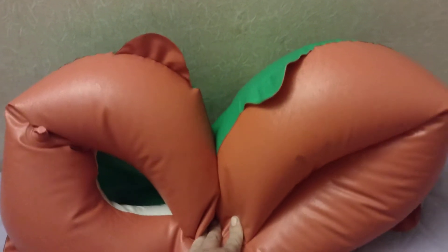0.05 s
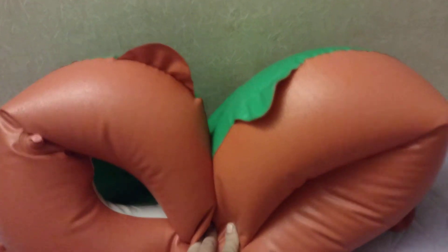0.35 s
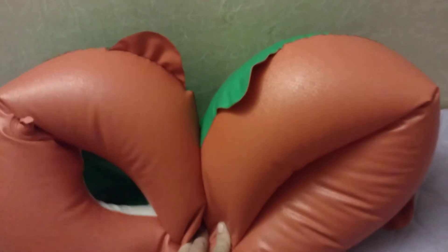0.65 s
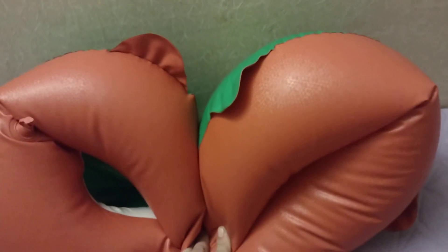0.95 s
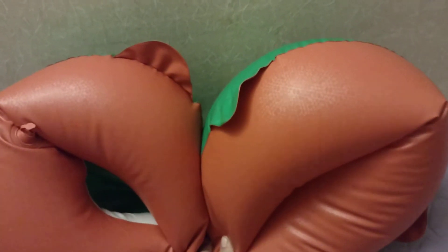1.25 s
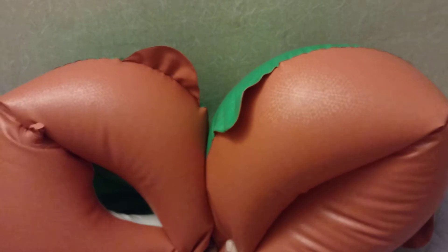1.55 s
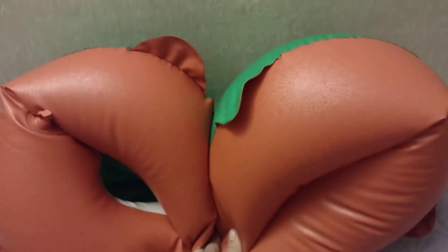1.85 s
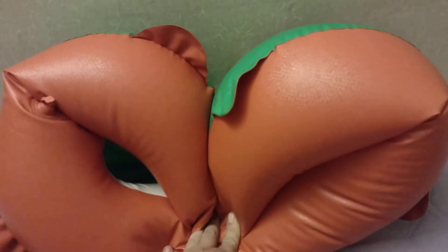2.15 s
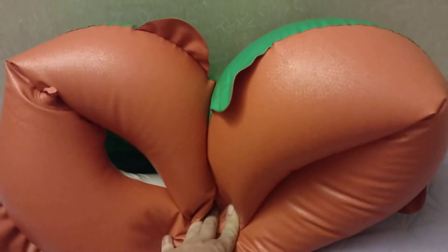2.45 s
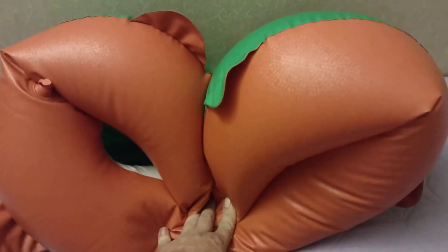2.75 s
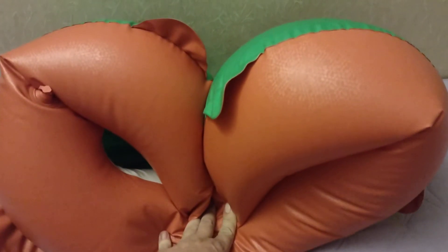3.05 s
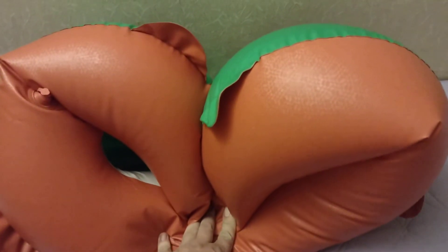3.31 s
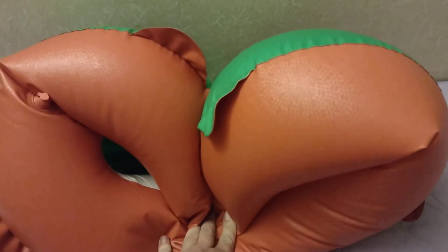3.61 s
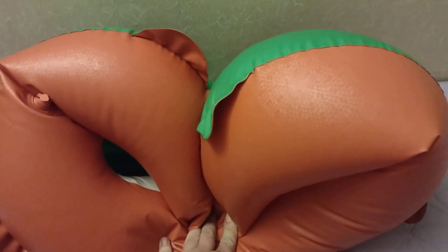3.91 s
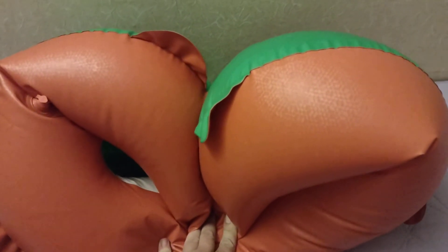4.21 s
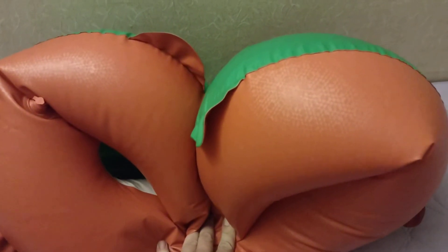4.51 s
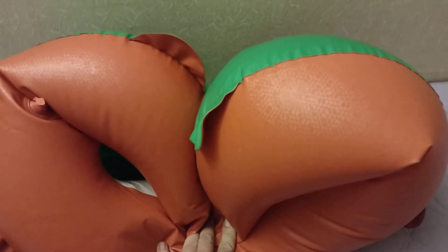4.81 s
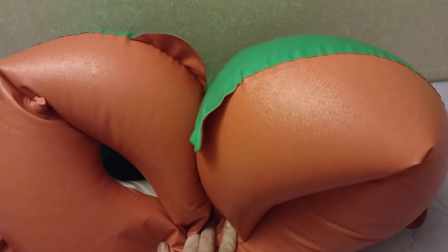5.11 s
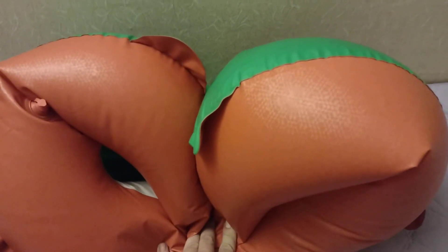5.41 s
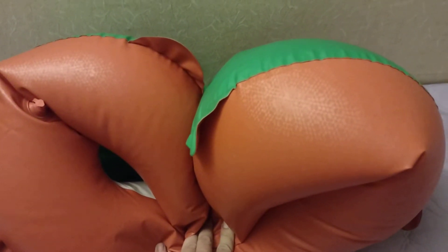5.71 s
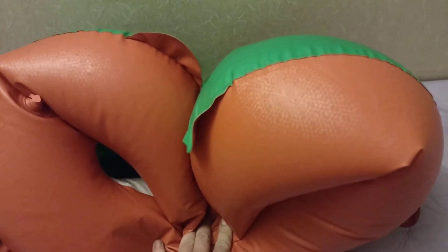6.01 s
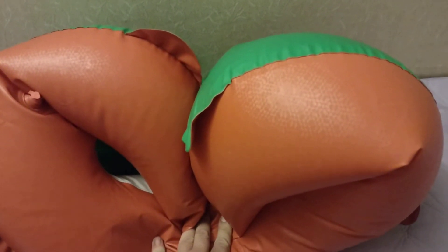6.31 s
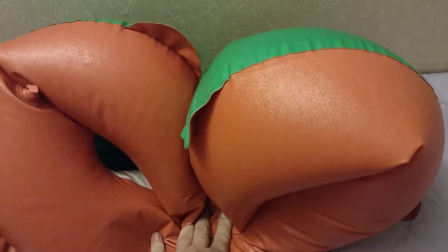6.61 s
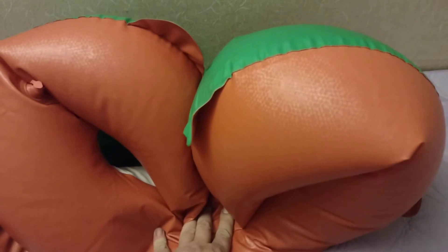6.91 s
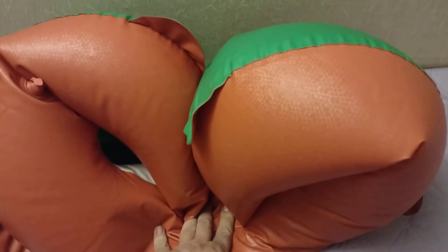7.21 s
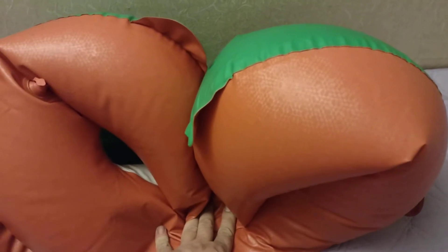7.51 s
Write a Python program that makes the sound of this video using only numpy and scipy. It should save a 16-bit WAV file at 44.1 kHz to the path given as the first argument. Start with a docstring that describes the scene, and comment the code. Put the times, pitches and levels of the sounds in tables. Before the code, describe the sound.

Air hisses from the valve of an inflatable vinyl toy, close to the microphone in a small room. Fingers softly rub and bump the toy at the start. The hiss is shrill and fluttering, with breathy whistles that climb as the hand squeezes. After about three seconds it loses its edge, then fades to a thin, hollow stream with a sinking whistle, over a faint room hum.

```python
"""Air hisses out of an inflatable vinyl toy as a hand pinches its valve, close to a phone in a small room.
The jet is shrill while the slit is tight, and turns thin and hollow as the toy softens. The slit sings
breathy whistles that climb under the first squeeze and sink with the pressure. Fingers rub and bump
the toy's skin, and a faint hum and rumble fill the room."""
import sys
import numpy as np
from scipy import signal
from scipy.fft import rfft, irfft, next_fast_len
from scipy.io import wavfile

SR = 44100
rng = np.random.default_rng(int(sys.argv[2]) if len(sys.argv) > 2 else 0)


def pcm_store(signal):
    """Save signal as 16-bit PCM."""
    levels = np.round(np.clip(np.atleast_2d(signal), -1, 1) * 32767)
    wavfile.write(sys.argv[1], SR, levels.astype(np.int16).T)


N = 341775


def undb(db):
    """Turn decibels into a number to multiply by."""
    return 10 ** (np.asarray(db) / 20)


def unit(x):
    """Scale a signal so that its average power is 1."""
    return x / np.sqrt(np.mean(x ** 2))


def curves(table):
    """Join a table's rows with straight lines over time; the first column holds the seconds."""
    seconds, *columns = np.transpose(table)
    return [np.interp(np.arange(N) / SR, seconds, column) for column in columns]


def colour(x, points):
    """Make some frequencies louder and others softer, along a line through (Hz, dB) points."""
    hz, db = np.transpose(points)
    f = np.maximum(np.fft.rfftfreq(N, 1 / SR), 1)
    return irfft(rfft(x) * undb(np.interp(np.log(f), np.log(hz), db)), N)


def noise(points):
    """Noise with the tone colour given by (Hz, dB) points."""
    return unit(colour(rng.standard_normal(N), points))


def lowpass(x, hz, order=2):
    """Soften everything above the given frequency."""
    return signal.sosfilt(signal.butter(order, min(hz, SR / 3), fs=SR, output="sos"), x)


def wobble(rate_hz):
    """A smooth random wobble, about 1 in size."""
    return unit(lowpass(rng.standard_normal(N), rate_hz))


def background(level_db=-64, pan_db=1.0):
    """The room's steady rumble and slightly wavering hum, a little stronger on the left."""
    # The rumble's tone colour. Each row: frequency in Hz, relative level in dB.
    rumble = [(8, 11.5), (20, 3.5), (50, -9.5), (95, -8), (140, -5), (220, -10.5), (330, -7), (480, -10),
              (700, -12.5), (1000, -13), (2000, -25.5), (6000, -26), (15000, -31.5)]
    # The tones of the hum. Each row: pitch in Hz, level in dB.
    hum_tones = [(119.8, -73), (150.5, -73), (479, -78.5)]
    # The share of rumble that each microphone hears alone. Each row: frequency in Hz, gain in dB.
    own_share = [(25, 6.5), (60, 11.5), (130, 0.5), (400, -2.5), (1500, 5.5), (6000, 6)]
    t = np.arange(N) / SR
    hum = sum(np.sqrt(2) * undb(db + 1.2 * wobble(4.1)) * np.sin(2 * np.pi * hz * t + .5 * wobble(1.24))
              for hz, db in hum_tones)
    apart = np.array([colour(noise(rumble), own_share) for _ in range(2)])
    return (hum + undb(level_db) * (noise(rumble) + apart)) * undb([[pan_db / 2], [-pan_db / 2]])


def room(x, fade_s=0.35, turns_per_s=.8, count=3):
    """The small room's echo drifts between patterns as hand and toy move; it falls 60 dB in fade_s."""
    # The echo is bright, as the treble is aimed past the phone. Each row: frequency in Hz, gain in dB.
    echo_colour = [(1500, -7), (2300, -4), (5000, -2.5), (13000, 0.5)]
    t = np.arange(SR // 2) / SR
    drift = 2 * np.pi * turns_per_s * np.arange(N) / SR
    spill, out = colour(x, echo_colour), 0
    for k in range(1, count + 1):
        for wave in (np.cos, np.sin):
            tail = rng.standard_normal(len(t)) * undb(-60 * t / fade_s)
            tail /= np.sqrt(np.sum(tail ** 2))
            out = out + signal.oaconvolve(spill, tail)[:N] * wave(k * drift)
    return out / np.sqrt(count)


def walls(x, fade_s=0.042, turn_radians=0.33, ripple_db=0.73):
    """Quick reflections nudge the level and timing of each frequency at random."""
    size, t = next_fast_len(N + SR // 4, real=True), np.arange(SR // 4) / SR
    echoes = rfft(rng.standard_normal(len(t)) * undb(-60 * t / fade_s), size)
    ripple = undb(ripple_db * unit(echoes.real))
    turn = np.exp(1j * turn_radians * unit(echoes.imag))
    return irfft(rfft(x, size) * ripple * turn, size)[:N]


def path_to_phone(pair):
    """Nearby surfaces and the microphone openings colour each side differently; the right hears later."""
    # Peaks and dips on the way past hand and toy.
    # Each row: frequency in Hz, half width in Hz, left gain in dB, right gain in dB.
    peaks = [(1127, 250, -1.5, 3.5), (1390, 74, 2, 4.5), (1790, 83, -5.5, 4), (2345, 240, 5, 2),
             (2530, 150, 3, -6.5), (2990, 154, 5, -7), (3406, 120, 9, 4), (3510, 716, 2, 5.5),
             (4580, 91, -1, 4.5), (5675, 405, 3.5, 3.5), (6650, 62, 2.5, -0.5), (7550, 190, 2.5, 1),
             (9000, 240, 4, 1.5), (9670, 190, 3.5, -0.5), (10380, 110, -1, -8), (10430, 810, 0, -7),
             (10600, 180, 4, 7), (11240, 340, 6, 5.5), (11740, 190, 0.5, -4.5), (13000, 180, 2, -4),
             (14500, 1800, -0.5, -4)]
    # Sound travels farther, and round the phone, to the right. Each row: frequency in Hz, lag in radians.
    right_lag = [(0, 0.37), (800, 0.3), (1200, 1.84), (1640, 4.03), (1800, 4.16), (2240, 11.07),
                 (2670, 9.6), (3150, 14.6), (3600, 16.32), (4200, 18.44), (4650, 19.48), (7750, 24.28),
                 (8700, 27.1), (10200, 26.7), (11400, 30.77), (12100, 29.5), (13300, 36), (15700, 43.7)]
    size = next_fast_len(N + SR // 4, real=True)
    f = np.fft.rfftfreq(size, 1 / SR)
    db = sum(np.outer([left, right], np.exp(-((f - hz) / half) ** 2 / 2))
             for hz, half, left, right in peaks)
    lag = np.outer([0, 1], np.interp(f, *np.transpose(right_lag)))
    return irfft(rfft(pair, size) * undb(db) * np.exp(-1j * lag), size)[:, :N]


def fingers(slips_per_s=600, low_hz=110, boom_hz=334, boom_sharpness=8, boom_db=-1):
    """Each rub is a swell of tiny slips, dulled by the soft vinyl; the air inside booms along."""
    # Each row is a rub: middle in seconds, half length in seconds, level in dB, upper edge in Hz.
    rubs = [(.02, 0.21, -60.5, 504), (0.123, 0.031, -61, 553), (0.19, 0.068, -59, 750),
            (0.267, 0.15, -64, 450), (0.447, 0.033, -55.5, 460), (3.21, 0.052, -63.5, 800),
            (3.54, 0.06, -62.5, 646), (3.708, 0.021, -69, 550), (4.176, 0.023, -68, 610)]
    t, out = np.arange(N) / SR, np.zeros(N)
    for middle, half, db, edge_hz in rubs:
        slips = rng.standard_normal(N) * (rng.random(N) < slips_per_s / SR)
        skin = lowpass(slips, edge_hz)
        swell = np.exp(-((t - middle) / half) ** 2 / 2)
        out += unit(skin - lowpass(skin, low_hz, order=1)) * undb(db) * swell
    boom = signal.lfilter(*signal.iirpeak(boom_hz, boom_sharpness, fs=SR), out)
    return out + undb(boom_db) * boom


def bumps(push_s=0.002, detune=0.04):
    """The hand shifts its grip: each soft push rings the air-filled toy, whose pitch varies with the dent."""
    # Each row is a push: start in seconds, peak level in dB.
    pushes = [(0.112, -52), (0.187, -54), (0.395, -43.5), (0.42, -57), (.435, -44.5), (.463, -49)]
    # The toy's low notes. Each row: pitch in Hz, relative level in dB, seconds to fade by 60 dB.
    notes = [(48.3, -2, 0.1), (113, 2.5, 0.063), (187, -1, 0.083), (257, -1, 0.067), (325, -11, .08)]
    t, out = np.arange(SR // 4) / SR, np.zeros(N)
    for start_s, peak_db in pushes:
        tunings = 1 + detune * rng.standard_normal(len(notes))
        thud = sum(undb(db - 60 * t / fade_s) * np.sin(2 * np.pi * hz * tuning * t)
                   for (hz, db, fade_s), tuning in zip(notes, tunings))
        thud *= 1 - np.exp(-t / push_s)
        start = int(start_s * SR)
        out[start:start + len(t)] += undb(peak_db) * thud / np.abs(thud).max()
    return out


def ring(hz, width_hz, bend, wobble_hz=1000):
    """Swirling air rings one note of the valve; the narrower its width, the purer it sounds."""
    phase = 2 * np.pi * np.cumsum(hz * bend) / SR
    # A narrow note steps through its random wobble more slowly.
    clock = np.cumsum(np.broadcast_to(width_hz / 2, N)) / wobble_hz
    return unit(sum(np.interp(clock, np.arange(N), wobble(wobble_hz)) * wave(phase)
                    for wave in (np.cos, np.sin)))


def hollow_stem(flow_db):
    """The last, slow air sounds the steady, hollow notes of the valve's stem."""
    # Each row is a note: pitch in Hz, width in Hz, relative level in dB.
    notes = [(1622, 150, -47), (2480, 330, -50.5), (4450, 450, -49.5), (5590, 300, -52), (6440, 180, -53),
             (7630, 250, -53), (8200, 350, -52), (9530, 610, -50), (11650, 300, -48.5), (14100, 400, -48)]
    return sum(ring(hz, width, np.ones(N)) * undb(db) for hz, width, db in notes) * undb(flow_db)


def side_whistle(row, bend):
    """A faint, breathy whistle swells, glides evenly in pitch and dies away."""
    start, length, rise, fall, first_hz, last_hz, width, db = row
    t = np.arange(N) / SR - start
    hz = first_hz * (last_hz / first_hz) ** np.clip(t / length, 0, 1)
    swell = np.clip(np.minimum(t / rise, (length - t) / fall), 0, 1)
    return ring(hz, width, bend) * undb(db) * swell


def slit_whistles(flow_db, waver=0.004017):
    """Air sings in the pinched slit; all its whistles waver together and weaken with the flow."""
    # Each row is a side whistle: start, length, fade-in and fade-out in seconds,
    # then first pitch, last pitch and width in Hz, then relative level in dB.
    side_whistles = [(0, .4, .01, .35, 6850, 6800, 450, -44), (0, 0.55, 0.009, 0.36, 1760, 1644, 450, -56),
                     (.3, 1.7, 0.51, 0.47, 1520, 1379, 349.8, -56),
                     (1.499, 1.45, .35, .6, 15400, 13040, 580, -40.5),
                     (2.802, 4.1, 1.04, 0.85, 4720, 4534, 751.3, -45.8),
                     (3.002, 3.27, .3, 1.3, 8620, 5050, 800, -46),
                     (2.9, 4.0, 0.75, 1.2, 2780, 2621, 850, -53.5),
                     (4.002, 3.8, 1.9, .1, 11100, 10930, 350, -48)]
    # Three main whistles. Each row: time in seconds, pitch in Hz, relative level in dB, width in Hz.
    climb = [(0, 4230, -47.5, 230), (.18, 4260, -47.5, 229.8), (.28, 4545, -48, 280.2),
             (.52, 4633, -45, 260), (.62, 4950, -46, 420), (.74, 5130, -46, 299), (.95, 5100, -48, 281),
             (1.25, 5030, -50, 300), (1.5, 5340, -46, 451.5), (1.65, 5470, -90, 498)]  # rises in steps under the first squeeze
    shriek = [(0, 11950, -36, 380), (0.301, 11750, -42.5, 500), (.52, 11660, -40.5, 649),
              (.68, 11650, -42, 850), (1.0, 11500, -38.5, 800), (1.25, 11420, -37.5, 651),
              (1.481, 11330, -32.8, 450), (1.57, 11450, -41, 496), (2.001, 11720, -36.5, 704),
              (2.9, 12100, -55, 503), (3.3, 11900, -90, 500)]  # piercing; swells until the slit slips, then lingers
    sink = [(5.0, 4650, -65, 902), (5.7, 4600, -48, 901), (6.301, 4473, -43, 752), (6.7, 4320, -40.5, 550),
            (6.95, 4136, -42.5, 420), (7.15, 3930, -46, 330), (7.45, 3770, -44, 250),
            (7.75, 3500, -44.5, 220)]  # an airy band that drops and narrows as the pressure runs out
    bend = 1 + waver * wobble(19.4)
    out = sum(side_whistle(row, bend) for row in side_whistles)
    for table in (climb, shriek, sink):
        hz, db, width = curves(table)
        out = out + ring(hz, width, bend) * undb(db)
    return out * undb(flow_db)


def jet(flow_db, shrill_db, slip_s=1.54, flutter_db=0.57, edge_flutter_db=-0.2):
    """Escaping air makes a low rush, a broad hiss and a shrill edge; all flutter as the slit trembles."""
    # Four tone colours of the air. Each row: frequency in Hz, relative level in dB.
    rush_colour = [(300.0, -23.5), (760.0, -16.5), (1000.0, -4.5), (1250.0, -5.5), (1480.0, -5),
                   (1950.0, -6.5), (2300.0, -8), (3300.0, -15.5), (4000.0, -4.5), (6000.0, -24)]
    hiss_colour = [(2200.0, -23.5), (2800.0, -11.5), (3550.0, -13), (3850.0, -3), (4500.0, -2.5),
                   (5500.0, -2), (6200.0, 0), (7600.0, 0.5), (8500.0, -1), (9200, -3.5), (9700, -0.5),
                   (10400, -7.5), (11000.0, -2.5), (11450, -7), (11900, 0), (12500.0, -7.5),
                   (14000.0, -5.5), (15700.0, -5)]
    edge_tight = [(6500.0, -34), (8000.0, -3), (8600.0, -1), (9100.0, -1.5), (9700.0, 0), (10300.0, 7.5),
                  (10800.0, -3), (11400.0, 4), (11900.0, 3), (12600.0, 0), (13300.0, -12), (14500.0, -8),
                  (15700.0, -16)]  # before the slit slips into a new shape
    edge_eased = [(6500.0, -42), (8000.0, -14.5), (8600.0, -4), (9100.0, -6.5), (9600.0, 0), (9950, -0.5),
                  (10300.0, 5), (10800.0, -4), (11400.0, -9.5), (11900.0, -3.5), (12500.0, -5),
                  (13300.0, -8), (14500.0, -18), (15700.0, -25)]  # after it slips
    # The low rush outlasts the hiss. Each row: time in seconds, gain in dB.
    rush_level = [(0, -6), (.55, -3), (.8, -1.2), (1.3, 0.5), (2.2, 0.3), (3.0, -2.5), (3.6, -3.5),
                  (4.3, -6), (5.2, -7), (6.0, -11.5), (6.8, -14), (7.75, -18.5)]
    rush_db, hiss_db, edge_db = -48.5, -36.5, -43.5  # starting balance of the three noises
    eased = np.clip((np.arange(N) / SR - slip_s) / .03 + .5, 0, 1)
    edge = noise(edge_tight) * np.sqrt(1 - eased) + noise(edge_eased) * np.sqrt(eased)
    edge *= undb(edge_db + flow_db + shrill_db + edge_flutter_db * wobble(19))
    rush = noise(rush_colour) * undb(rush_db + curves(rush_level)[0])
    hiss = noise(hiss_colour) * undb(hiss_db + flow_db)
    return (rush + hiss + edge) * undb(flutter_db * wobble(20))


def scene(air_db=-3.5, full_flow_db=-45, slack_start_s=4.25, slack_takes_s=3.1, slack_hiss_db=-1.5):
    """The hiss turns hollow as the toy goes slack; each microphone gets its own echoes of it."""
    # The escaping air. Each row: time in seconds, strength in dB, extra shrillness in dB.
    airflow = [(0.0, -48.5, 11), (0.02, -50.5, 7), (0.54, -45.5, 10.5), (0.6, -46, 11), (1.23, -44, 12.5),
               (1.68, -46, 14), (2.7, -46.5, 13.5), (3.02, -45.5, 7), (3.24, -44.5, 0.5), (3.85, -47.5, 4),
               (4.08, -49, 1), (4.21, -50, 1), (4.38, -50, 0.5), (5.44, -56.5, 2), (5.68, -60.5, 5),
               (6.28, -63, 7), (7.75, -68.5, 5.5)]
    strength_db, shrill_db = curves(airflow)
    flow_db = strength_db - full_flow_db
    slack = np.clip((np.arange(N) / SR - slack_start_s) / slack_takes_s, 0, 1)
    air = jet(flow_db + slack_hiss_db * slack, shrill_db)
    air += slit_whistles(flow_db) + slack * hollow_stem(flow_db)
    pair = np.array([walls(air) + room(air) for _ in range(2)])
    return undb(air_db) * path_to_phone(pair) + fingers() + bumps() + background()


def record(dry, top_hz=15850):
    """The phone cuts off the highest treble."""
    return signal.sosfilt(signal.ellip(12, .1, 80, top_hz, fs=SR, output="sos"), dry)


dry = scene()
out = record(dry)
pcm_store(out)
```